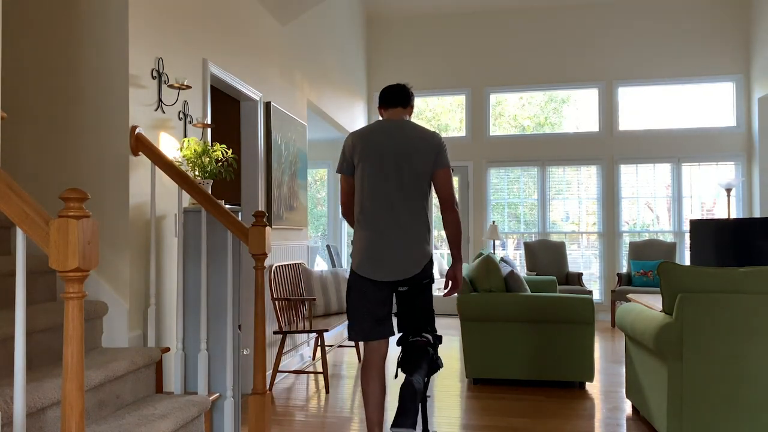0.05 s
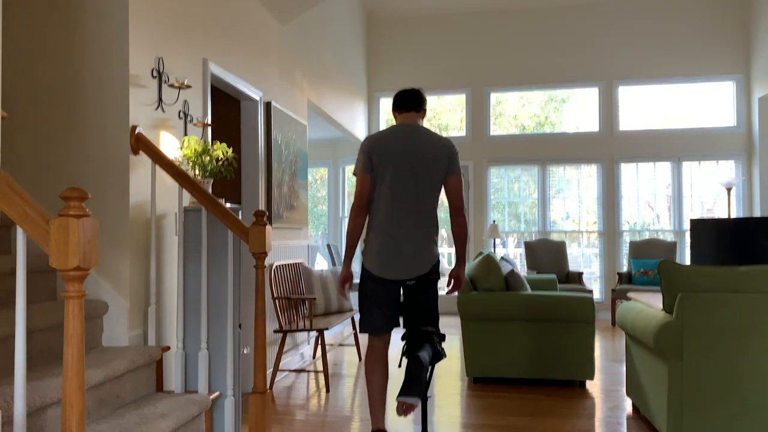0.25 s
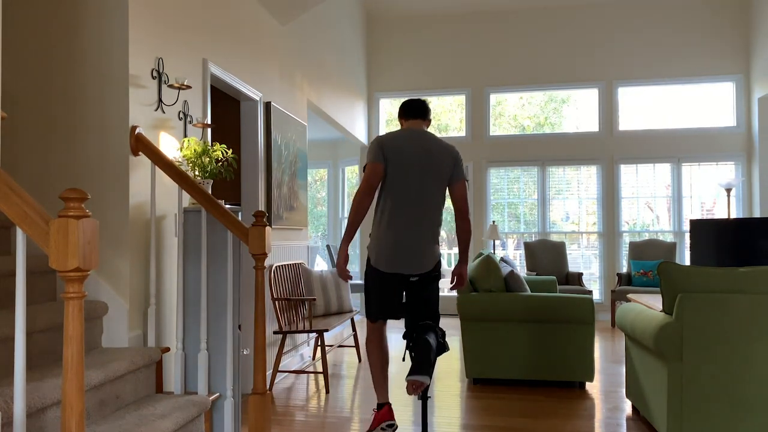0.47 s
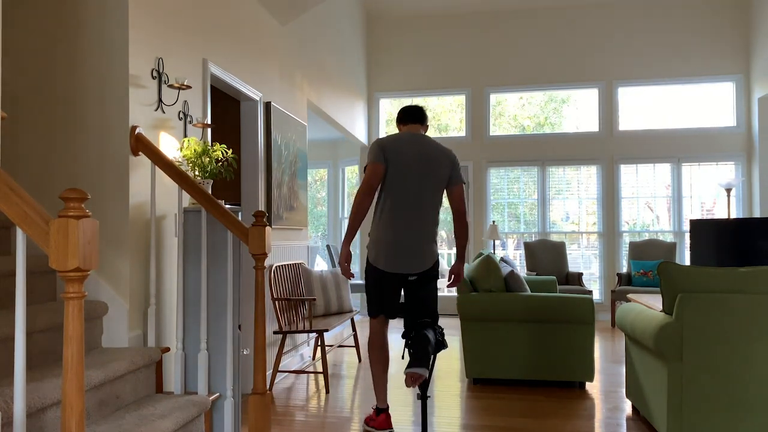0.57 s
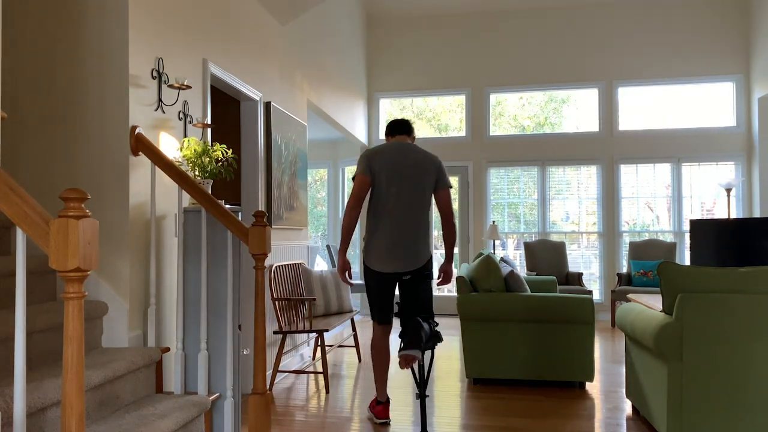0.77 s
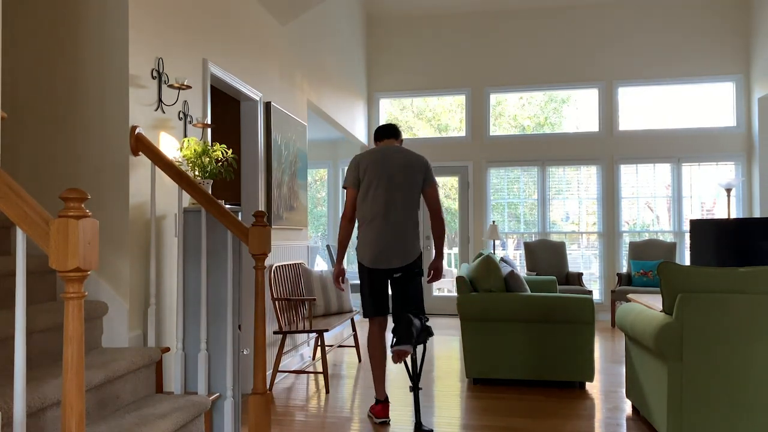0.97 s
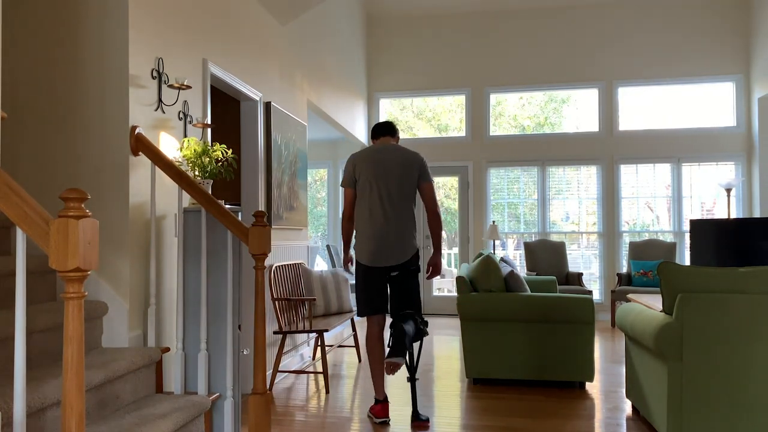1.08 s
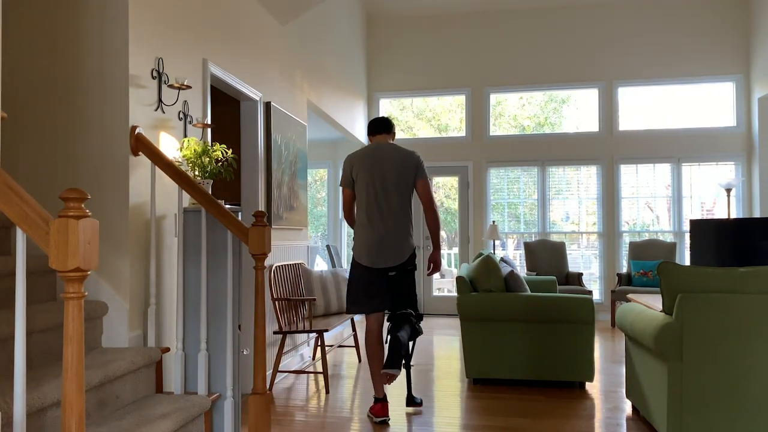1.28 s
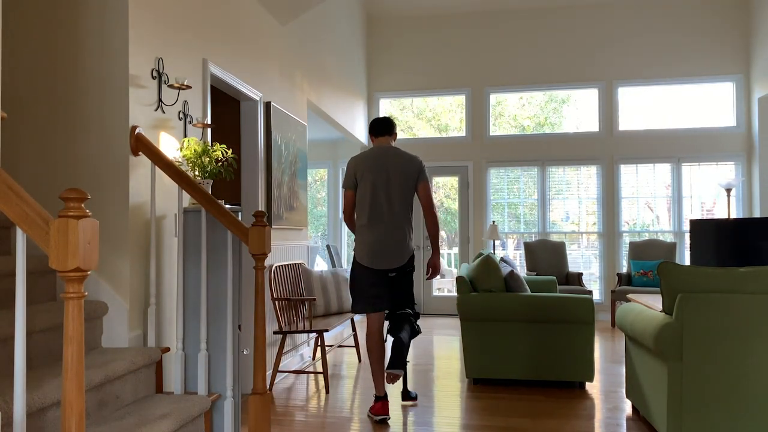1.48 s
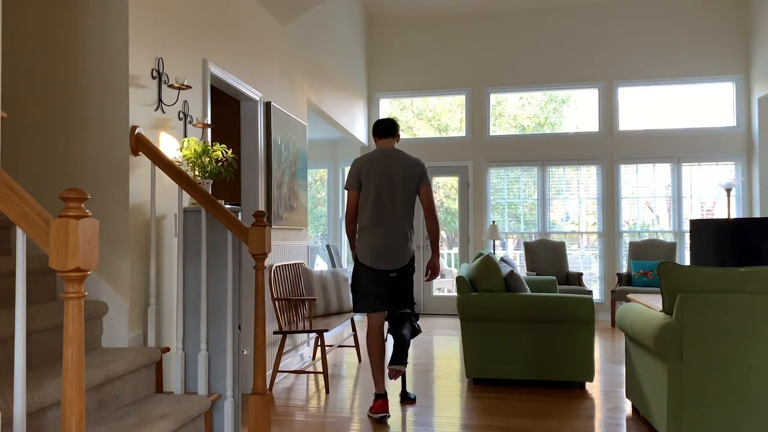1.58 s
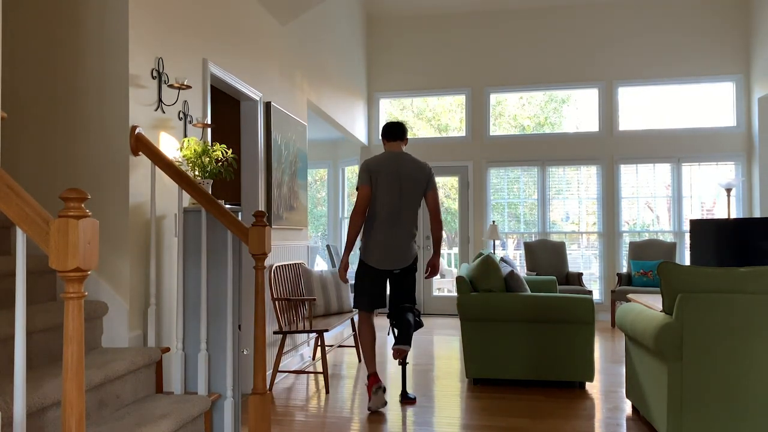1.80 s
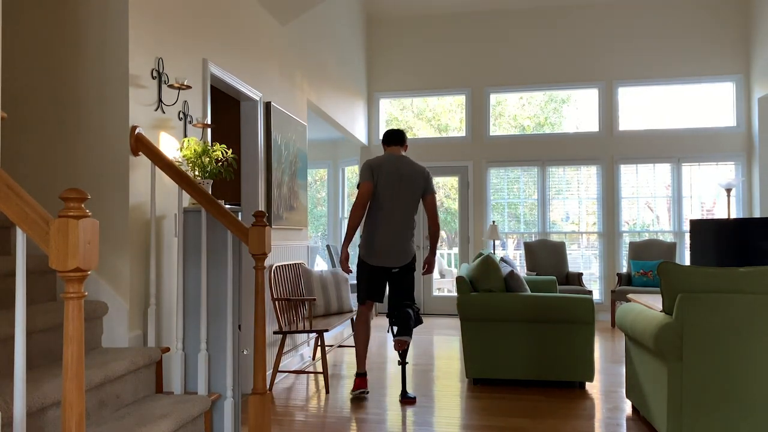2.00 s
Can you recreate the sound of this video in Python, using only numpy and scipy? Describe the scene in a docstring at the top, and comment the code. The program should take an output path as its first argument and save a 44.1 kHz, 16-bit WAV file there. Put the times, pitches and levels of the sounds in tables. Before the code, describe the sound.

In a quiet, slightly echoing living room, a crutch strikes the floorboards twice, moving away from the microphone. Each knock has a short rattle and a low boom; between them come small clicks of the fittings and one soft footstep.

```python
"""A tall living room, wooden floor: someone walks away on one shoe and one strap-on crutch.
Each of two crutch thumps sends a bending wave through the boards (treble first), rattles the frame
and sets the floor booming. Around the thumps, weight shifts, the crutch's fittings click and the
shoe lands softly. The room rings after the contacts, over the hush of the house."""
import sys
import numpy as np
from scipy import signal
from scipy.fft import rfft, irfft
from scipy.io import wavfile

SR = 44100
rng = np.random.default_rng(int(sys.argv[2]) if len(sys.argv) > 2 else 0)


def log_audio(samples):
    """Write samples as a 16-bit WAV file to the path given in sys.argv[1]."""
    # one column per channel
    frames = np.atleast_2d(samples).T
    # limit to full scale, then quantise
    limited = np.clip(frames, -1, 1)
    pcm = np.round(limited * 32767).astype(np.int16)
    wavfile.write(sys.argv[1], SR, pcm)


N = 90404
FFT_SIZE, GRIT_SIZE = 2 ** 18, 2 ** 14
T = np.arange(N) / SR
HZ = np.maximum(np.arange(FFT_SIZE // 2 + 1) * SR / FFT_SIZE, 1)

# still air of the house: (frequency [Hz], gain [dB])
HUSH_COLOUR = [(13, -45.5), (22, 6), (120, -4.5), (175, -14.5), (582, -23.5), (978, -27.5), (1320, -28.5),
               (1560, -39), (1780, -31.5), (6980, -41), (9430, -39), (11700, -49.5), (15000, -55.5)]
# weight shifts: (time [s], flex level [dB], thud level [dB], swell [s])
WEIGHT_SHIFTS = [(0.016, -65.5, -74.5, 0.0052), (0.172, -68, -53.5, 0.021), (0.713, -74, -59.5, 0.034),
                 (0.807, -47.5, -57.5, 0.022), (.878, -65.5, -50, 0.0074), (.922, -48, -50, 0.011),
                 (1.08, -71, -79, .03), (1.2, -64, -78, 0.022), (1.334, -64, -75, .015),
                 (1.91, -58.5, -80, 0.015)]
# board thud: (frequency [Hz], gain [dB])
THUD_COLOUR = [(25, -12), (55, 0.5), (85, -6), (118, 1), (150, -0.5), (210, 1.5), (260, -0.5), (320, -7),
               (430, -16), (900, -26), (3000, -54)]
# fittings: (time [s], level [dB], decay [s], ring frequency [Hz], ring height [dB])
FITTING_CLICKS = [(0.0925, -60, 0.0028, 6030, 5), (0.704, -76, 0.0079, 6040, 17),
                  (0.743, -79, .012, 6200, 5), (0.906, -65.5, 0.0058, 10150, 7.5)]
# click: (frequency [Hz], gain [dB])
FITTING_COLOUR = [(300, -23), (900, 2), (1700, 1), (2200, -7.5), (4000, 0), (7500, 1), (10000, 4.5),
                  (13500, -3.5), (16000, -10)]
# crutch landings, near then far:
# (time [s], wave level [dB], travel time at 1 kHz [s], rattle level [dB], rattle decay [s])
CRUTCH_THUMPS = [(0.1997, -31, .0034, -43.5, 0.0035), (1.6459, -37.5, .0066, -49, 0.0021)]
# boards at the landing spots: (frequency [Hz], near gain [dB], far gain [dB])
BOARD_COLOUR = [(24.5, -14, -14), (61, -13.5, -10), (126, -10.5, -1), (201.4, 5, 4), (330, -6.5, -14),
                (500, -8.5, -12), (875, -8.5, -12), (1240, -6.5, -14.5), (1539, -16.5, -23),
                (1890, -11.5, -23), (2637, -27, -28.5), (5765, -38.5, -42), (15000, -56, -43)]
# hollow board resonances: (frequency [Hz], width [Hz], near height [dB], far height [dB])
BOARD_RESONANCES = [(583, 110, 4.5, 3.5), (816.6, 110, 6, 3.5), (1213, 270, 1, 10.5), (1766, 260, -4, 10.5),
                    (2280, 320, -0.5, 2.5)]
# frame rattle: (frequency [Hz], gain [dB])
RATTLE_COLOUR = [(700, -32), (1500, -3), (3000, -5.5), (5000, -2), (7000, -4.5), (10000, 0), (11500, -11.5),
                 (14000, -1), (16000, -17)]
# floor modes: (frequency [Hz], near level [dB], far level [dB], t60 [s])
BOOM_MODES = [(31, -33, -45, 0.79), (53.63, -30, -25, 0.42), (72.5, -19.5, -53.5, .24),
              (93.8, -33.5, -41, 0.75), (116.9, -33.5, -32, 0.53), (173.4, -31, -29.5, .36),
              (205.1, -23, -33.5, 0.41), (212.7, -33, -33.5, 0.43), (226.3, -33, -42.5, 0.72),
              (253, -35.5, -40, 0.52), (298, -42, -62, 0.55), (475.3, -41, -55.5, 0.92),
              (550, -35.5, -65, 0.21), (833, -36, -43, .25), (936, -39.5, -81, .3), (1170, -47, -47, 0.44),
              (1776, -66, -52, 0.78)]
# sole contacts: (time [s], level [dB], decay [s], pitch [Hz])
SOLE_SLAPS = [(.79, -68, 0.12, 1220), (.877, -59.5, .003, 1270), (.9, -61, 0.03, 1270),
              (.992, -65, 0.0089, 2450)]
# sole: (frequency / pitch [ratio], gain [dB])
SOLE_COLOUR = [(.15, 0.5), (.3, 5.5), (.45, 2), (.7, 2), (1.1, 5.5), (1.7, -7.5), (3, -16.5), (10, -57)]
# reverberation: (frequency [Hz], gain [dB], t60 [s], left-right likeness [0..1])
ROOM_BANDS = [(40.6, -2.5, 0.54, .97), (120, 3.5, 0.6, .96), (254, 3, 0.73, .88), (500, 5, 0.82, 0.4),
              (1200, 5.5, 0.84, 0.067), (2550, 6.5, 0.76, 0.052), (4646, 2.5, 0.64, .1),
              (8000, -5.5, 0.55, .05), (13100, -5, 0.3, 0.038)]
# microphone balance: (frequency [Hz], left minus right [dB])
MIC_BALANCE = [(60, -3), (130, -2), (250, 0.3), (1000, 1.2), (2500, 1.5), (5000, 1.5), (9000, -3.3),
               (14000, 0)]


def from_db(db):
    """Decibels to gain."""
    return 10 ** (np.asarray(db) / 20)


def at_hz(table, hz, column=1):
    """Table column, interpolated over log frequency."""
    rows = np.array(table)
    return np.interp(np.log(hz), np.log(rows[:, 0]), rows[:, column])


def at_level(x, db):
    """Scale to this rms level, energy taken over 0.1 s."""
    energy = np.mean(np.sum(x ** 2, -1))
    return x * from_db(db) * np.sqrt(SR / 10 / (energy + 1e-20))


def peak_db(hz, width_hz, height_db):
    """Gain curve of one resonance."""
    return height_db / (1 + (2 * (HZ - hz) / width_hz) ** 2)


def causal(colour_db):
    """Minimum-phase response of a gain curve, rolled off below 20 Hz."""
    cepstrum = irfft(np.log(from_db(colour_db) / np.sqrt(1 + (20 / HZ) ** 4)))
    cepstrum[1:FFT_SIZE // 2] *= 2
    cepstrum[FFT_SIZE // 2 + 1:] = 0
    return np.exp(rfft(cepstrum))


def filtered(x, response):
    """Apply a frequency response."""
    return irfft(rfft(x, FFT_SIZE) * response)[..., :N]


def delayed(x, delay_s):
    """Delay by a phase ramp."""
    return filtered(x, np.exp(-2j * np.pi * HZ * delay_s))


def grit(envelope, evenness=0.6):
    """Many tiny impacts under one envelope, chance resonances partly flattened; unit energy."""
    impacts = rng.standard_normal(N) * envelope
    spectrum = rfft(impacts[:GRIT_SIZE], 2 * GRIT_SIZE)
    evened = irfft(spectrum / (np.abs(spectrum) + 1e-12) ** evenness)[:GRIT_SIZE]
    return evened / np.sqrt(np.sum(evened ** 2))


def burst(envelope, colour_db, db):
    """Rough contact: coloured grit."""
    return at_level(filtered(grit(envelope), causal(colour_db)), db)


def stereo_noise():
    """White noise, alike left and right in the bass, unrelated in the treble."""
    likeness = at_hz(ROOM_BANDS, HZ, column=3)
    mid, side = rng.standard_normal((2, N))
    mid = filtered(mid, np.sqrt((1 + likeness) / 2))
    side = filtered(side, np.sqrt((1 - likeness) / 2))
    return np.array([mid + side, mid - side])


def house_hush(level_db=-65):
    """Low rumble and faint hiss of the house."""
    air = filtered(stereo_noise(), causal(at_hz(HUSH_COLOUR, HZ)))
    return from_db(level_db) * air / air.std()


def weight_shifts(flex_hz=30.44, flex_t60_s=0.26):
    """Soft loads flex the floor and thud on the boards; returns (flex, thuds)."""
    flex, thuds = 0, 0
    for time_s, flex_db, thud_db, swell_s in WEIGHT_SHIFTS:
        envelope = (1 - np.exp(-T / swell_s)) * from_db(-60 * T / flex_t60_s)
        sag = -envelope * np.sin(2 * np.pi * flex_hz * T)
        thud = burst(T * np.exp(-T / swell_s), at_hz(THUD_COLOUR, HZ), thud_db)
        flex += delayed(at_level(sag, flex_db), time_s)
        thuds += delayed(thud, time_s)
    return flex, thuds


def fitting_clicks(ring_width_hz=1000):
    """Fittings click brightly as the crutch swings and is unloaded."""
    clicks = 0
    for time_s, db, decay_s, ring_hz, ring_db in FITTING_CLICKS:
        colour_db = at_hz(FITTING_COLOUR, HZ) + peak_db(ring_hz, ring_width_hz, ring_db)
        clicks += delayed(burst(np.exp(-T / decay_s), colour_db, db), time_s)
    return clicks


def bending_waves():
    """Boards carry treble faster than bass: each thump arrives as a quick downward sweep."""
    waves = 0
    for spot, (time_s, db, travel_s, _, _) in enumerate(CRUTCH_THUMPS):
        dispersion = np.exp(-4j * np.pi * travel_s * np.sqrt(1000 * HZ))
        colour_db = at_hz(BOARD_COLOUR, HZ, column=spot + 1)
        for hz, width_hz, *heights_db in BOARD_RESONANCES:
            colour_db += peak_db(hz, width_hz, heights_db[spot])
        sweep = irfft(causal(colour_db) * dispersion)[:N]
        waves += delayed(at_level(sweep, db), time_s)
    return waves


def joint_echoes(waves, gain=1.2, decay_s=0.0042, corner_hz=1200):
    """Board joints scatter short waves, roughening the knock; long waves pass."""
    echoes = rfft(grit(np.exp(-T / decay_s)), FFT_SIZE)
    highpass = HZ / (HZ + corner_hz)
    return gain * filtered(waves, echoes * highpass)


def frame_rattle(delay_s=0.001149):
    """The crutch's joints snap tight as the tip lands."""
    rattle = 0
    for time_s, _, _, db, decay_s in CRUTCH_THUMPS:
        envelope = np.exp(-(T / decay_s) ** 2 / 2)
        rattle += delayed(burst(envelope, at_hz(RATTLE_COLOUR, HZ), db), time_s + delay_s)
    return rattle


def floor_boom(delay_s=0.00393):
    """Floor modes swell over about one cycle after each thump, then decay; levels depend on the spot."""
    boom = 0
    for spot, (time_s, *_) in enumerate(CRUTCH_THUMPS):
        age_s = np.maximum(T - time_s - delay_s, 0)
        for hz, *levels_db, t60_s in BOOM_MODES:
            swell = 1 - np.exp(-(age_s * hz) ** 2)
            decay = from_db(levels_db[spot] - 60 * age_s / t60_s)
            boom += swell * decay * np.sin(2 * np.pi * hz * age_s)
    return boom


def shoe_slaps(attack_s=0.003):
    """Heel, sole and toe brush down in turn."""
    slaps = 0
    for time_s, db, decay_s, pitch_hz in SOLE_SLAPS:
        envelope = (1 - np.exp(-T / attack_s)) * np.exp(-T / decay_s)
        slaps += delayed(burst(envelope, at_hz(SOLE_COLOUR, HZ / pitch_hz), db), time_s)
    return slaps


def room(x, delay_s=0.0013, build_s=0.0025):
    """Diffuse reverberation in half-octave bands, each with its own t60."""
    edges_hz = 22 * 2 ** (np.arange(20) / 2)
    noises = stereo_noise(), stereo_noise()
    age_s = np.maximum(T - delay_s, 0)
    build = 1 - np.exp(-age_s / build_s)
    response = 0
    for k, (low_hz, high_hz) in enumerate(zip(edges_hz, edges_hz[1:])):
        centre_hz = np.sqrt(low_hz * high_hz)
        bandpass = signal.butter(2, [low_hz, high_hz], "band", fs=SR, output="sos")
        band = signal.sosfilt(bandpass, noises[k % 2])[:, ::-1]  # reversed: filter settled at onset
        tail = band * build * from_db(-60 * age_s / at_hz(ROOM_BANDS, centre_hz, column=2))
        band_share = 2 * (high_hz - low_hz) / SR
        energy = np.mean(np.sum(tail ** 2, -1))
        response += tail * from_db(at_hz(ROOM_BANDS, centre_hz)) * np.sqrt(band_share / energy)
    return filtered(x, rfft(response, FFT_SIZE))


def scene(rattle_spread=0.37, crutch_send_db=3.5, left_lag_s=38e-6):
    """Contacts, direct and through the room, over the floor's boom and flex and the hush."""
    flex, thuds = weight_shifts()
    waves, rattle, clicks = bending_waves(), frame_rattle(), fitting_clicks()
    boards = waves + shoe_slaps() + thuds
    contacts = boards + joint_echoes(waves) + np.sqrt(1 - rattle_spread) * rattle + clicks
    centre = contacts / 2 + floor_boom() + flex
    direct = np.array([delayed(centre, left_lag_s), centre])
    wide_rattle = np.sqrt(rattle_spread) * np.array([frame_rattle(), frame_rattle()])
    reverb = room(boards) + room(from_db(crutch_send_db) * (rattle + clicks))
    return direct + (wide_rattle + reverb) / 2 + house_hush()


def record(dry, stopband_hz=16200):
    """Two microphones of slightly unequal colour, then a steep low-pass."""
    half_db = at_hz(MIC_BALANCE, HZ) / 2
    coloured = filtered(dry, from_db([half_db, -half_db]))
    lowpass = signal.cheby2(16, 70, stopband_hz, fs=SR, output="sos")
    return signal.sosfilt(lowpass, coloured)


dry = scene()
out = record(dry)
log_audio(out)
```